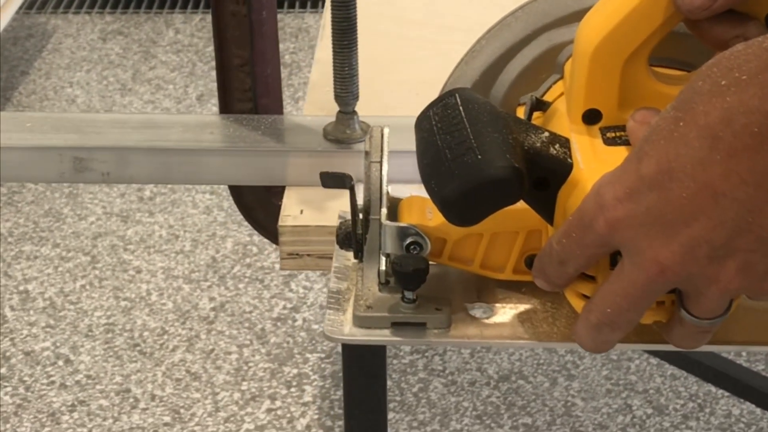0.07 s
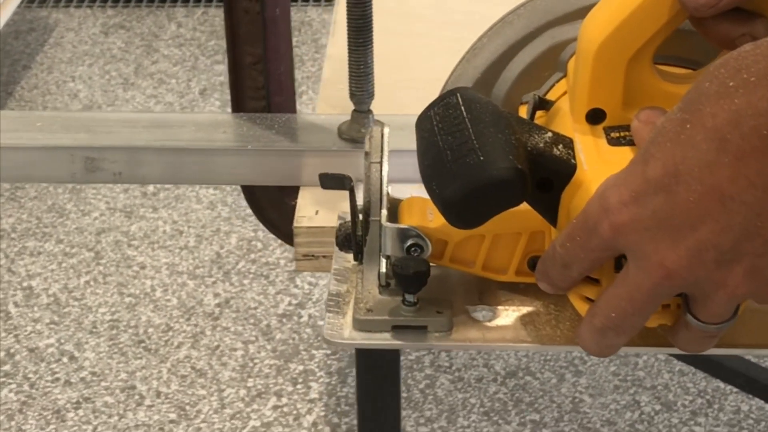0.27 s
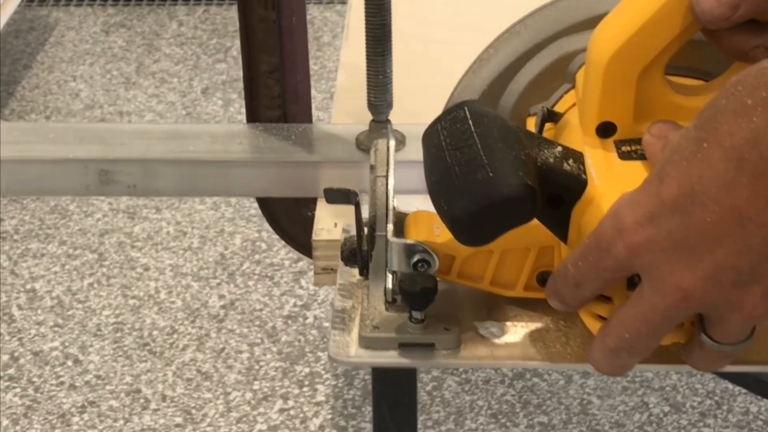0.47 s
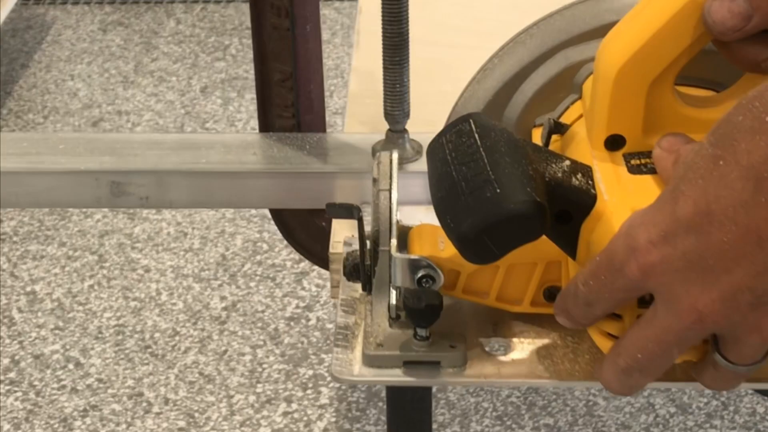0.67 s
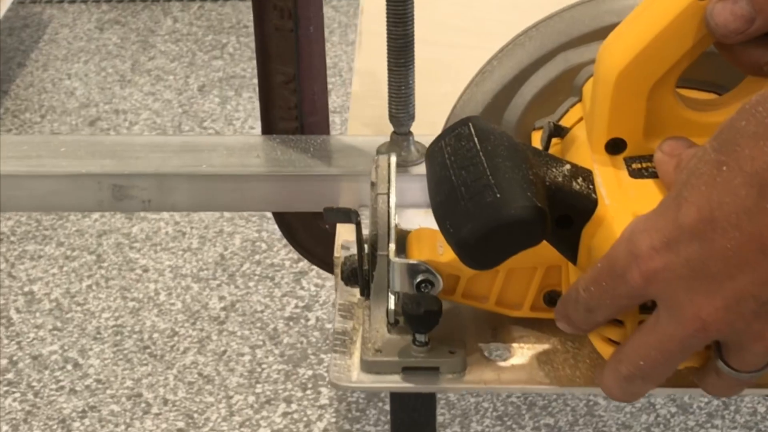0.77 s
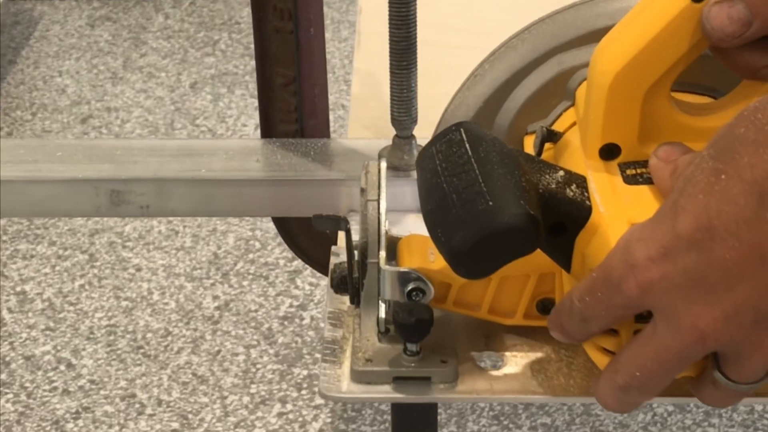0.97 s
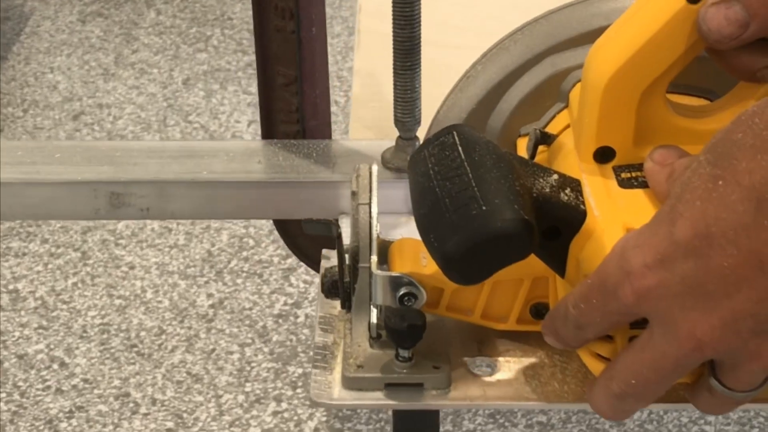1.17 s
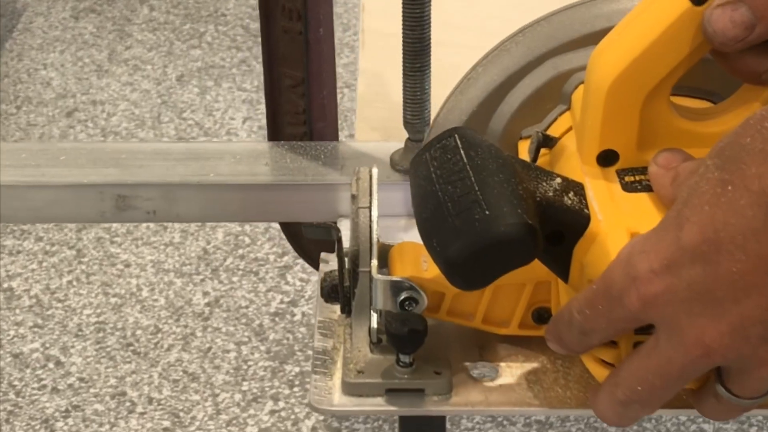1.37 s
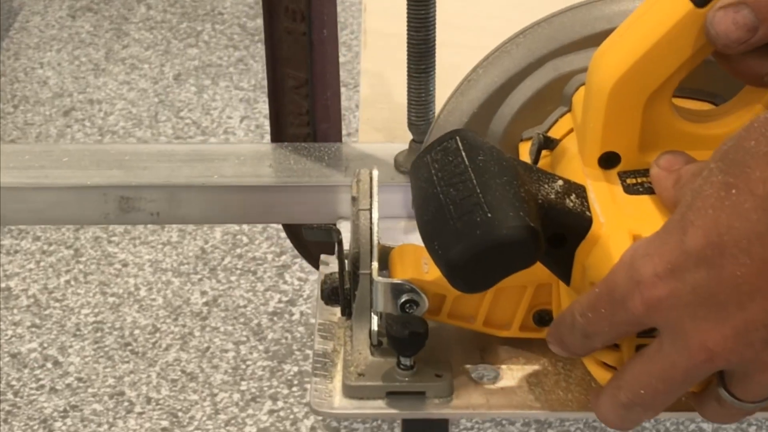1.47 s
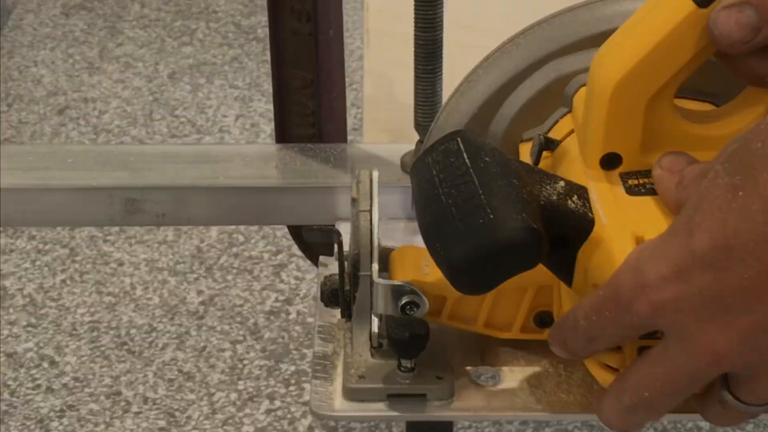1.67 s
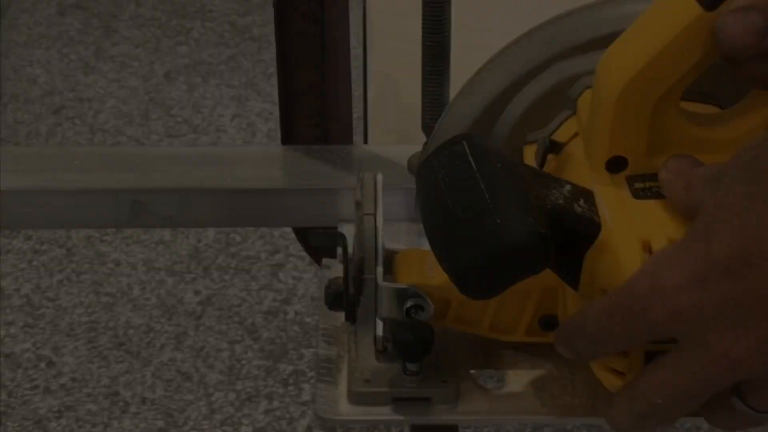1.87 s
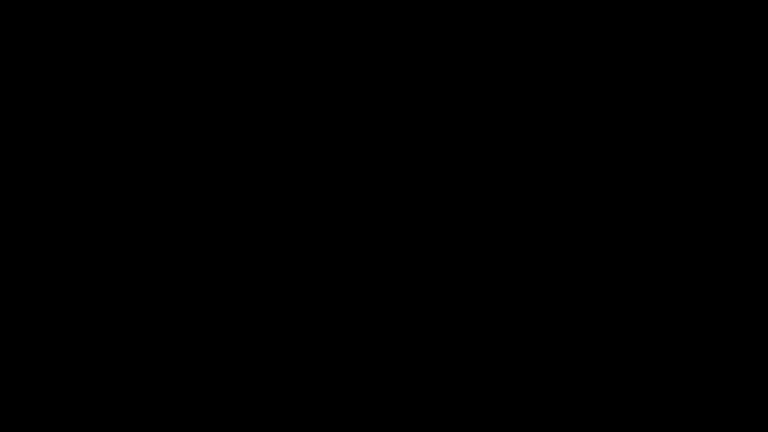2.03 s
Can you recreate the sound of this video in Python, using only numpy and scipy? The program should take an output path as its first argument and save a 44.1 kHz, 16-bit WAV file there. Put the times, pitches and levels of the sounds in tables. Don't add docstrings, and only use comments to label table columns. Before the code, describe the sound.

A hand-held circular saw runs at full power from the start, cutting plywood close to the microphone. A dense, bright rush of torn wood mixes with a shrill metallic blade whine, motor and fan tones, and faint low board hums. Singing tones come and go. Pitch lifts slightly near 1 second; from about 1.3 it softens, the blade spins free around 1.7, speeding up while fading to silence by 2.1.

```python
import sys
import numpy as np
from scipy import signal
from scipy.fft import rfft, irfft
from scipy.io import wavfile
from scipy.ndimage import uniform_filter1d, map_coordinates

SR = 44100
rng = np.random.default_rng(int(sys.argv[2]) if len(sys.argv) > 2 else 0)


def wav_record(signal):
    frames = np.transpose(np.atleast_2d(signal))
    bounded = np.clip(frames, -1, 1)
    quanta = np.round(bounded * 32767).astype(np.int16)
    wavfile.write(sys.argv[1], SR, quanta)


def invert_db(level):
    return 10 ** (np.asarray(level, dtype=float) / 20)


N = 94197
T = np.arange(N) / SR
HZ = np.fft.rfftfreq(N, 1 / SR)

SLOTS = 4
GEAR = 43 / 9


def unit(x):
    return x / np.sqrt(np.mean(x ** 2) + 1e-20)


def along(points, hz):
    f, value = np.transpose(points)
    return np.interp(np.log(hz + 1), np.log(f + 1), value)


def curve(rows):
    return np.interp(T, *np.transpose(rows))


def wobble(rate):
    coarse_s = np.arange(0, N / SR, .002)
    knots = rng.standard_normal(80)
    smooth = map_coordinates(knots, [coarse_s * np.clip(rate, .1, 35)])
    return np.interp(T, coarse_s, smooth)


def swell(middle_s, half_s):
    return np.exp(-((T - middle_s) / half_s) ** 4)


def resonance(center_hz, width_hz):
    return 1 / (1 + (2 * (HZ - center_hz) / width_hz) ** 2)


def tone(cycles, waver_db, flutter_db=2.15):
    slow_rate, quick_rate = 4.49, 22
    level_db = waver_db * wobble(slow_rate) + flutter_db * wobble(quick_rate)
    return np.sqrt(2) * np.sin(2 * np.pi * cycles) * invert_db(level_db)


def freed():
    free_s, width_s = 1.66, 0.22
    return .5 + .5 * np.tanh((T - free_s) / width_s)


def rush(spectrum):
    # center in Hz, width in Hz, boost in dB.
    disc = [(2796, 210, 5.5), (4025, 58, 6.5), (5060, 94, 9), (6000, 50, 6.5), (11700, 120, 3.5),
            (14800, 150, 2.5), (1030, 110, 4.5), (4480, 60, 6.5)]
    patch_db = 1.02
    grains = signal.stft(rng.standard_normal(N), nperseg=512)[2]
    patches = uniform_filter1d(rng.standard_normal(grains.shape), 6, 0)
    patches = uniform_filter1d(patches, 14, 1)
    noise = signal.istft(grains * invert_db(patch_db * unit(patches)), nperseg=512)[1][:N]
    color_db = along([(15, -62)] + list(spectrum), HZ)
    ring_db = sum(db * resonance(center, width) for center, width, db in disc)
    return unit(irfft(rfft(noise) * invert_db(color_db + ring_db), N))


def dust(turns):
    # frequency in Hz, level in dB per Hz.
    in_wood = [(30, -12), (361, -14), (457, -19), (1500, -4), (2860, -4), (12100, -3), (15100, -5),
               (15750, -20)]
    # frequency in Hz, level in dB per Hz.
    in_air = [(30, -6), (300, -19), (480, -23), (1240, -6.5), (2800, -4.5), (12000, -6.5), (15100, -5.5),
              (15750, -21)]
    wood_db, air_db, surge_db = -2, -3, 0.57
    turn_pulse = 0.083 * np.sin(2 * np.pi * turns)
    slot_pulse = 0.077 * np.sin(2 * np.pi * SLOTS * turns)
    free = freed()
    wood = invert_db(wood_db) * np.sqrt(1 - free) * rush(in_wood)
    air = invert_db(air_db) * np.sqrt(free) * rush(in_air)
    surge = invert_db(surge_db * (wobble(8.8) + wobble(17.73)))
    return (wood + air) * (1 + turn_pulse + slot_pulse) * surge


def blade(turns, phase):
    # frequency in Hz, level in dB.
    order_shape = [(60, -17), (300, -12.5), (900, -10.5), (2500, -0.5), (6500, 0), (10000, -7.5),
                   (13000, -2), (15800, -13)]
    slot_db, even_db, odd_db = -25, -33.5, -31
    mean_hz = turns[-1] * SR / N
    total = np.zeros(N)
    for order in range(1, len(phase)):
        if order % SLOTS == 0:
            level_db = slot_db
        else:
            level_db = odd_db if order % 2 else even_db
        level_db = level_db + along(order_shape, order * mean_hz)
        total += invert_db(level_db) * tone(order * turns + phase[order], waver_db=3.5)
    return total


def motor(turns):
    multiples = [4, 9, 13, 26]
    # starting level in dB, change in dB from start to end.
    levels = [
        (-42, -6.5),
        (-40, 3),
        (-14.5, -3.5),
        (-16, -23),
    ]
    grow = np.arange(N) / N
    total = np.zeros(N)
    for multiple, (start_db, gain_db) in zip(multiples, levels):
        voice = tone(multiple * GEAR * turns, 0.69, flutter_db=2.0)
        total += invert_db(start_db + gain_db * grow) * voice
    return total


def shaft(turns):
    # time in seconds, level in dB.
    shaft_level = [(0, -43), (.85, -43.5), (1.02, -51), (1.3, -47.5), (1.42, -45), (1.6, -48), (1.85, -45),
                   (2.0, -48), (2.1, -57)]
    return invert_db(curve(shaft_level)) * tone(GEAR * turns, .3, flutter_db=1.2)


def singing(turns, phase):
    singers = [24, 24, 26, 16, 36, 36, 40, 40, 40, 44, 44, 48, 52, 52, 60, 68, 68, 100, 104, 128, 128, 132,
               132, 136, 136, 140, 144, 144, 156, 16]
    # middle in seconds, half length in seconds, level in dB.
    swells = [(0.42, 0.49, -37), (1.08, .22, -29.5), (0.33, 0.61, -38), (1.49, 0.15, -37),
              (1.524, .12, -32.5), (1.96, 0.11, -41.5), (0.37, 0.085, -33), (1.066, 0.18, -33),
              (1.45, 0.14, -30.5), (0.47, 0.33, -35.5), (1.477, 0.096, -32.5), (1.23, 0.24, -37),
              (0.37, 0.17, -29.5), (1.9, 0.078, -37), (0.98, 0.29, -32.5), (0.096, .2, -30.5),
              (0.71, 0.15, -33), (.25, 0.33, -34), (0.31, .3, -37), (0.31, 0.2, -34.5), (1.12, 0.092, -31),
              (0.46, 0.27, -31), (1.06, 0.18, -32), (0.79, 0.35, -37), (1.2, 0.37, -36), (0.62, 0.16, -31),
              (0.69, 0.11, -28), (1.15, 0.12, -33), (1.12, 0.2, -31.5), (1.91, 0.16, -47.5)]
    total = np.zeros(N)
    for order, (middle, half, db) in zip(singers, swells):
        beat = invert_db(2.5 * np.sin(2 * np.pi * (turns + rng.random())))
        voice = tone(order * turns + phase[order], .6)
        total += invert_db(db - 2.5) * swell(middle, half) * beat * voice
    return total


def board_hum():
    # pitch in Hz, middle in seconds, half length in seconds, level in dB.
    hums = [
        (129, 0.54, 0.15, -39),
        (235, .15, .2, -46),
        (146.7, 0.82, 0.86, -47.5),
        (66.3, 0.286, .06, -43.5),
        (65, 1, 0.097, -43.5),
        (65, 1.5, 0.061, -43),
        (595, 1.004, 0.16, -46),
        (180, 1.734, .12, -54.5),
        (4280, 1.736, 0.13, -43),
    ]
    total = np.zeros(N)
    for hz, middle, half, db in hums:
        total += invert_db(db) * swell(middle, half) * tone(hz * T, 1.0, flutter_db=0.9)
    return total


def rubbing():
    # center in Hz, width in Hz, middle in seconds, half length in seconds, level in dB.
    rubs = [(1751, 11.4, .62, 1, -34), (9740, 1100, 0.32, 0.25, -25.5), (9700, 900, 0.495, 0.061, -24.5),
            (10150, 780, 0.93, .35, -29), (8400, 1200, 1.51, 0.029, -29), (2770, 530, 0.98, 0.094, -29),
            (3680, 60, 1.6, 0.037, -32), (11690, 16, 0.99, 0.19, -28), (2830, 91, 1.72, 0.26, -36.5),
            (5010, 30, 0.98, 0.3, -37), (830, 88, 0.77, 0.54, -47), (1717, 30, 1.09, 0.27, -35)]
    total = np.zeros(N)
    for center, width, middle, half, db in rubs:
        noise = rfft(rng.standard_normal(N))
        hiss = unit(irfft(noise * resonance(center, width), N))
        total += invert_db(db) * swell(middle, half) * hiss
    return total


def scene():
    # time in seconds, turns per second.
    speed = [(0, 73.3), (.17, 73.63), (.28, 73.42), (.39, 73.61), (.53, 73.52), (.66, 73.74), (.82, 73),
             (.9, 72.8), (1.0, 74.73), (1.14, 74.95), (1.27, 74.83), (1.42, 75.74), (1.55, 75.2), (1.8, 77),
             (2.0, 79.5), (2.14, 77)]
    # time in seconds, level in dB.
    loudness = [(0, -16), (.03, -16), (.24, -15), (.36, -16.5), (.46, -16.5), (.58, -16), (.75, -15.5),
                (1.04, -15.5), (1.1, -15.5), (1.27, -15.5), (1.35, -18), (1.4, -18), (1.52, -17.5),
                (1.63, -21), (1.75, -22.5), (1.9, -27.5), (2.02, -32), (2.1, -40)]
    turns = np.cumsum(curve(speed)) / SR
    phase = rng.random(size=213)
    saw = invert_db(curve(loudness)) * (dust(turns) + blade(turns, phase) + motor(turns))
    saw = saw + shaft(turns) + singing(turns, phase) + board_hum() + rubbing()
    return np.array([saw, saw])


def low_pass(x):
    return signal.sosfilt(signal.butter(12, 16600, fs=SR, output="sos"), x)


def record(dry):
    low_hz, top_hz, end_s = 52, 15740, 2.1065
    keep = (HZ < top_hz) / (1 + (low_hz / (HZ + 1)) ** 6)
    band = irfft(rfft(dry) * keep, N)
    return low_pass(band * (T < end_s))


dry = scene()
out = record(dry)
wav_record(out)
```